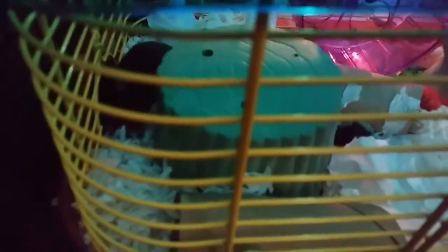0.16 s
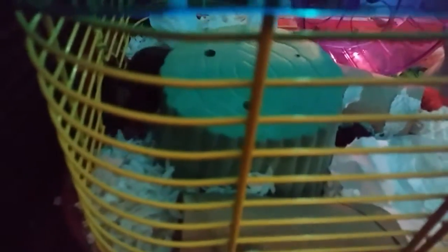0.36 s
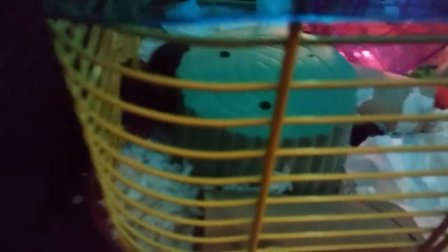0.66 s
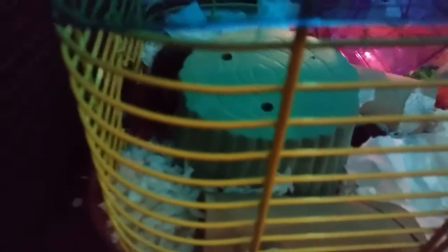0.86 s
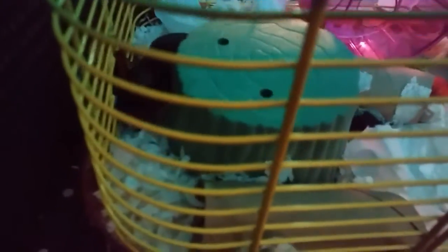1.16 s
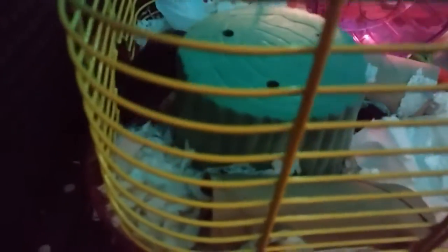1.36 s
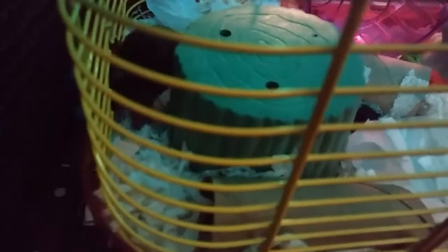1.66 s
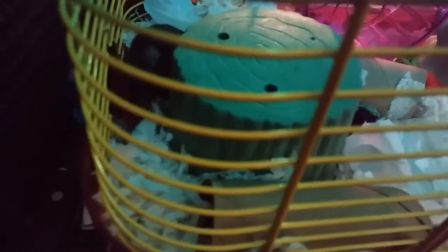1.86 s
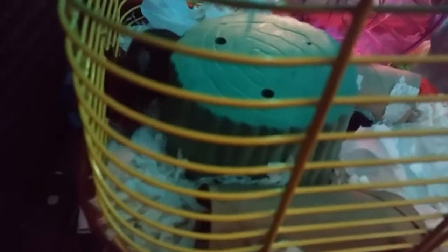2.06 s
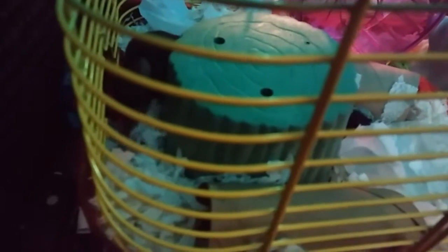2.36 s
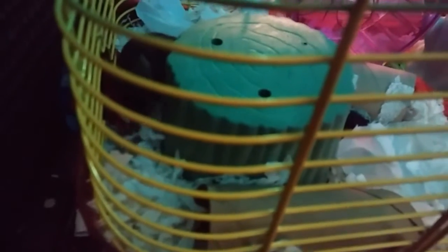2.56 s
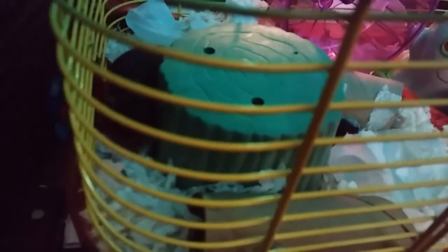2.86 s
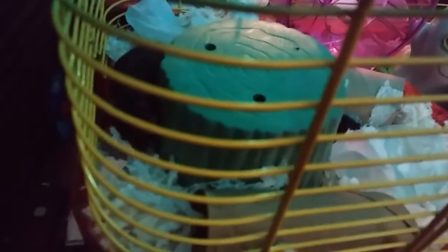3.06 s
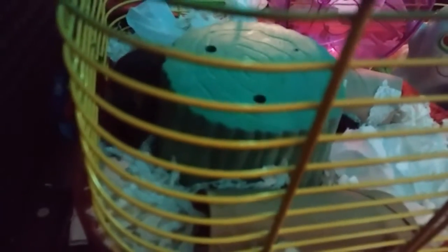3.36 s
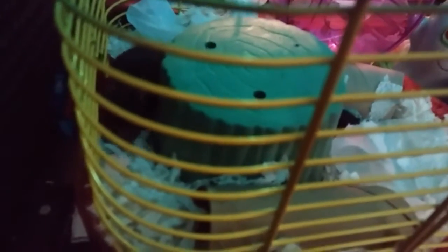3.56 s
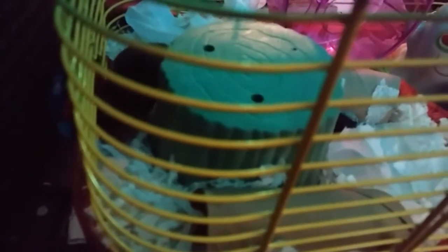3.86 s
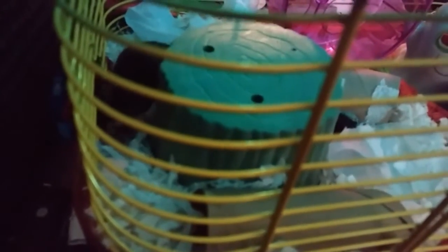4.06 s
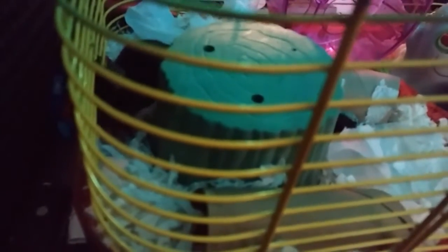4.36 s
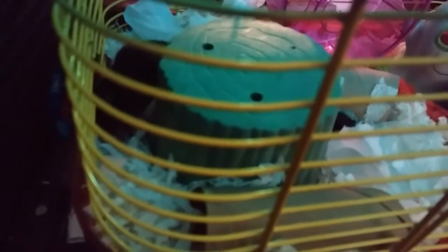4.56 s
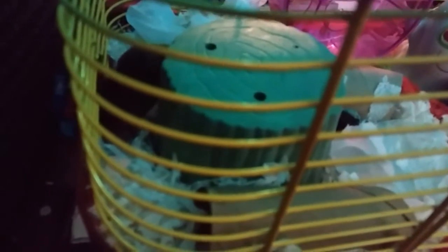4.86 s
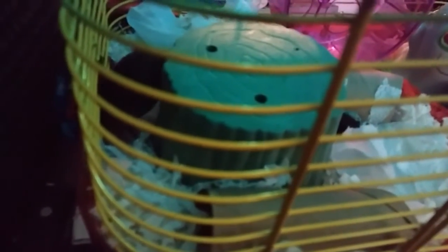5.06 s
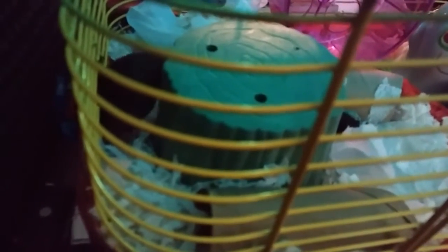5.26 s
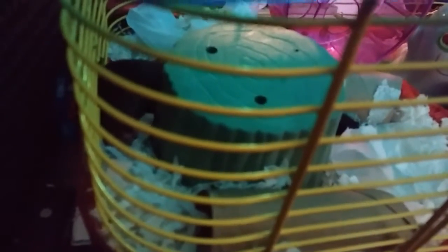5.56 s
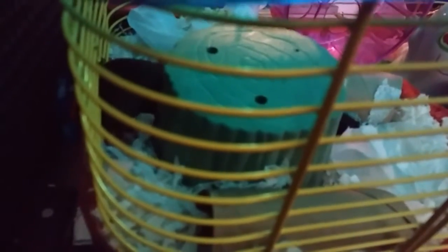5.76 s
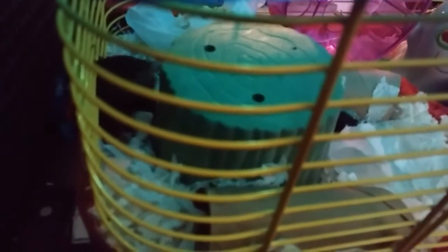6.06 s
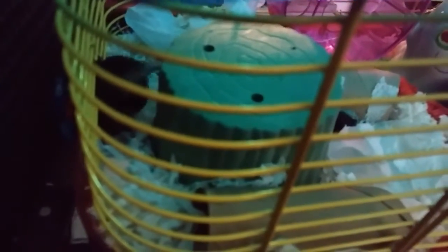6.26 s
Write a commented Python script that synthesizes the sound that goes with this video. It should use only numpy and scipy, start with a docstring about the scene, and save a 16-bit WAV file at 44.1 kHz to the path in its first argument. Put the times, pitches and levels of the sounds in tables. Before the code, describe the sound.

Close, dry clicks, snaps and rubs of a handled plastic phone case over faint paper bedding rustle and soft hiss.

```python
"""Handling a phone near a small pet

Fingers rub and tap a phone's plastic case, which ticks, snaps and flexes with dull thumps.
These sounds reach the microphone straight through the case, so they have no echo.
Faintly behind them, a small pet shuffles through paper bedding in its cage.
Under it all lie a quiet room hum and microphone hiss."""
import sys
import numpy as np
from scipy import signal
from scipy.fft import rfft, irfft
from scipy.io import wavfile
from scipy.ndimage import uniform_filter1d

SR = 44100
rng = np.random.default_rng(int(sys.argv[2]) if len(sys.argv) > 2 else 0)


def transcribe(u):
    """Save the signal u as a 16-bit wav file named by the first command-line argument.

    u: samples, shape (n,) or (channels, n), limited to [-1, 1]; the rate is SR.
    q: integer samples, one column per channel.
    """
    v = np.clip(np.atleast_2d(u).T, -1, 1)
    q = np.round(v * 32767).astype(np.int16)
    wavfile.write(sys.argv[1], SR, q)


N = 283104
TIME = np.arange(N) / SR

# Ticks of the case. Each row: time in seconds, level in dB, pitch in Hz,
# hardness from 0 (dull) to 1 (bright), rebound level in dB compared with the tick.
CASE_TICKS = [(0.0292, -18, 1880, .14, -11), (0.0704, -14, 1780, .01, -17),
              (.1448, -14.5, 1960, 0.11, -9.5), (0.172, -17, 1600, .01, -10),
              (.228, -14.5, 1700, .01, -7.5), (.3255, -14.5, 1690, .01, -8.5),
              (0.3699, -20, 1570, .01, -5.5), (0.6018, -17, 1800, 0.19, -25),
              (0.7343, -21, 1160, 0.022, -15), (1.0162, -26, 1780, .25, -18),
              (1.099, -19.5, 1980, 0.19, -22), (1.1135, -21, 1600, 0.15, -20),
              (1.1561, -15, 1800, 0.14, -24), (1.1625, -12.5, 1820, 0.26, -24),
              (1.1874, -23, 1500, 0.27, -21), (1.2133, -13.5, 1510, 0.064, -16),
              (1.5861, -13.5, 1840, 0.1, -6), (1.5941, -19, 1200, .01, -22),
              (1.6305, -10.5, 1550, 0.21, -10), (1.645, -22.5, 1530, 0.21, -10),
              (1.712, -24, 1980, .25, -13), (1.728, -32, 1860, 0.22, -21), (1.74, -31, 1810, 0.25, -19),
              (2.128, -31, 1730, 0.21, -14), (2.8642, -28.5, 890, .01, -20),
              (4.0578, -19.5, 1390, 0.11, -29)]
# Loud snaps, each led in by a creak. Each row: time in seconds, level in dB, hardness from 0 to 1,
# creak length in seconds, creak level in dB.
CASE_SNAPS = [(2.722, -8, 0.19, 0.0074, -20), (4.3403, -2, .86, 0.0075, -24.5),
              (4.6224, -3, .98, 0.0026, -16.5), (5.4764, -4.5, .98, 0.0063, -19.5)]
# Soft taps. Each row: time in seconds, peak level in dB.
FINGER_TAPS = [(.346, -30.5), (.474, -28.5), (.681, -29), (.724, -25.5), (.779, -28.5), (.8791, -26),
               (.972, -27), (1.002, -26.5), (1.016, -24), (1.114, -17), (1.133, -32), (1.175, -22.5),
               (1.188, -17.5), (1.325, -30.5), (1.387, -36.5), (1.442, -35.5), (1.477, -34.5), (1.645, -17),
               (1.917, -25), (2.161, -42), (2.189, -24), (2.271, -25.5), (2.556, -30), (2.618, -27.5),
               (2.657, -26), (2.864, -26.5), (2.915, -25.5), (3.338, -34), (3.518, -36.5), (4.745, -31),
               (4.775, -33), (4.959, -31), (5.067, -40), (5.117, -26.5), (5.232, -36.5), (5.35, -35),
               (5.37, -36), (5.386, -28)]
# Flexes of the case. Each row: time in seconds, peak level in dB, pitch in Hz.
CASE_THUMPS = [(.1779, -24.5, 175), (0.2336, -19.5, 208), (0.3786, -20.5, 237), (.4465, -34, 196),
               (0.5999, -27, 335), (0.775, -32.5, 180), (1.3509, -29.5, 167), (1.633, -10, 269),
               (1.6471, -17.5, 260), (2.7171, -21, 820), (2.763, -31, 124), (3.031, -42, 110),
               (4.3416, -21.5, 196), (4.455, -33, 170), (4.6228, -8.5, 573), (5.4782, -22, 194.7),
               (6.373, -36.5, 176)]
# The notes the case rings at. Each row: pitch in Hz, seconds to fade by 60 dB, strength in dB.
CASE_NOTES = [(215, 0.043, -52), (419, 0.022, 1.5), (500, 0.011, -7.5), (844, 0.008, -8.5),
              (1026, 0.033, -14.5)]
# Finger strokes. Each row: start and end in seconds, base level in dB, extra scratch and rumble in dB.
FINGER_STROKES = [(.459, 0.511, -52, 2, -1), (0.686, 0.736, -45.5, -2, 1), (0.733, 0.767, -38, 5.5, -3),
                  (0.778, .857, -50.5, 7, 0), (0.872, 0.897, -42.5, -23, -8), (.966, 1.052, -44, 4.5, 0.5),
                  (1.105, 1.141, -40, -18, -0.5), (1.153, 1.19, -35, -0.5, 0),
                  (1.211, 1.243, -39, 8.5, -10), (1.239, 1.274, -47.5, 12, -20),
                  (1.579, 1.674, -42.5, -13, -2), (1.711, 1.747, -44.5, -17, 2),
                  (2.527, 2.672, -49, -19, -7), (2.705, 2.808, -37, -1.5, -11),
                  (2.854, 2.923, -40.5, -24, -25), (3.236, 3.255, -62.5, 16, -8),
                  (3.507, 3.522, -49.5, -4, 3), (4.21, 4.243, -58, -8, 9.5), (4.416, 4.5, -41, -5.5, -12),
                  (4.513, 4.634, -42.5, -24, -19), (4.74, 4.792, -45.5, -3, -3),
                  (6.227, 6.272, -65, -5, 13)]
# How strongly the pet shuffles. Each row: time in seconds, base level in dB.
PET_SHUFFLE = [(0, -55.5), (.45, -55.5), (.9, -57), (1.4, -53.5), (1.8, -55), (2.1, -55.5), (2.28, -53.5),
               (2.55, -58.5), (2.8, -49.5), (2.95, -60.5), (3.05, -54), (3.35, -63), (3.52, -62.5),
               (3.68, -66), (4.1, -62), (4.45, -59), (4.8, -60), (4.92, -61.5), (5.42, -59), (5.6, -65),
               (6.17, -68.5), (6.42, -61.5)]
# The pet holds still. Each row: middle of the pause in seconds, length in seconds.
PET_PAUSES = [(2.016, 0.14), (2.356, 0.06), (4.163, 0.029), (4.718, 0.057), (5.29, 0.11)]
# The room's hum. Each row: pitch in Hz, width in Hz, level in dB.
HUM_BANDS = [(120, 26, -80.5), (234.7, 25, -70), (362, 21, -68)]

# A "colour" says how strong the low and high parts of a sound are.
# The colour of a dull tick. Each row: multiple of the tick's pitch, strength in dB.
DULL_COLOUR = [(.03, -6.5), (.08, -9), (.24, 5), (.5, 0), (1, 0.5), (1.4, -4), (1.9, -15.5), (2.8, -25.5),
               (4, -60.5), (9, -74.5)]
# The other colours. Each row: frequency in Hz, strength in dB.
SNAP_COLOUR = [(40, -28.5), (120, -7), (350, 4), (900, -1), (2000, -4.5), (3500, -13.5), (6000, -19),
               (9000, -30), (14000, -23.5), (17000, -39.5)]  # a bright snap of plastic
RUB_COLOUR = [(60, -22), (250, -6.5), (450, -5), (800, -1.5), (1150, -11), (1450, -17.5), (3000, -14),
              (8000, -43)]  # what sliding skin feeds into the case
SCRATCH_COLOUR = [(450, -28.5), (750, 14), (1080, 9.5), (1450, 0.5), (1950, 2), (2400, 1.5), (2850, -9.5),
                  (3600, -9), (4600, -22.5), (9000, -31), (16000, -48)]  # dry skin scratching
SIZZLE_COLOUR = [(2500, -33), (6500, 2), (12000, -4.5), (16000, -9.5)]  # the high sizzle of the driest strokes
RUMBLE_COLOUR = [(25, -6), (70, -17.5), (160, 0), (280, -3), (600, -21), (3000, -53)]  # the rumble under a stroke
PAPER_COLOUR = [(25, -39.5), (65, -1), (160, 4.5), (280, 0.5), (430, 0.5), (700, -13), (1200, -17.5),
                (2500, -25.5), (8000, -36.5)]  # shifting paper bedding
HISS_COLOUR = [(25, 7), (80, 11.5), (350, 8.5), (700, 11), (1500, 6.5), (3000, 3.5), (6000, -0.5),
               (9500, -5.5), (12500, -0.5), (15600, 0.5), (16200, -28.5)]  # microphone hiss


def ticks(rebound_s=0.0028, rebound_hz=1380, rebound_hardness=0.42):
    """The case ticks under the fingers and rebounds more weakly a moment later."""
    out = np.zeros(N)
    delays = rebound_s * (1 + 0.12 * rng.standard_normal(len(CASE_TICKS)))
    for (s, db, hz, hardness, rebound_db), delay_s in zip(CASE_TICKS, delays):
        add_jerk(out, s, db, hz, hardness)
        add_jerk(out, s + delay_s, db + rebound_db, rebound_hz, rebound_hardness)
    return out


def snaps(hz=1620, creak_hardness=0.28, gap_s=0.00122, jitter_s=0.00005):
    """Under a harder squeeze the case creaks in a run of quick jerks, then snaps through."""
    out = np.zeros(N)
    jitters = jitter_s * rng.standard_normal((len(CASE_SNAPS), 12))
    for (s, db, hardness, creak_s, creak_db), jitter in zip(CASE_SNAPS, jitters):
        start = s - creak_s
        add_jerk(out, start, creak_db + 6.5, hz, creak_hardness)  # the creak's first, louder jerk
        add_jerk(out, s, db, hz, hardness)  # the snap
        delays = np.arange(gap_s, 0.72 * creak_s, gap_s)  # the creak stops just before the snap
        for delay_s, late_s in zip(delays, jitter):
            add_jerk(out, start + delay_s + late_s, creak_db, hz, creak_hardness)
    return out


def add_jerk(out, s, db, hz, hardness, chatter_s=0.0018, smear_hz=1300):
    """Mix in one jerk of plastic letting go. The harder the release, the brighter it sounds."""
    t = TIME[:512]
    dull = click([(multiple * hz, gain_db) for multiple, gain_db in DULL_COLOUR])
    # A dull tick is smeared into a short wiggle, its low and high parts arriving at slightly different times.
    smear = np.exp(-2 * np.pi * smear_hz / SR)
    dull = signal.lfilter([smear, -1], [1, -smear], dull)
    jerk = (1 - hardness) * unit_peak(dull) - hardness * click(SNAP_COLOUR)
    # The surfaces chatter for a few milliseconds afterwards.
    chatter = 0.091 * (1 - hardness) * rng.standard_normal(len(t)) * np.exp(-t / chatter_s)
    sound = signal.fftconvolve(unit_peak(jerk), (t == 0) + chatter)
    peak_s = np.argmin(sound) / SR
    add(out, s - peak_s, gain(db) * sound)


def taps(contact_s=0.00052, grip_detune=0.08):
    """A soft push from a fingertip or a tick makes the case ring very briefly."""
    out, t = np.zeros(N), TIME[:512]
    push = t * np.exp(-2 * t / contact_s)
    tick_pushes = [(s + 0.0016, db - 21) for s, db, *_ in CASE_TICKS]
    for s, db in list(FINGER_TAPS) + tick_pushes + finger_catches():
        detune = grip_detune * rng.standard_normal(len(CASE_NOTES))  # the grip shifts each note
        tap = signal.fftconvolve(case_ring(detune), push)
        add(out, s - contact_s, -gain(db) * unit_peak(tap))
    return out


def finger_catches():
    """A sliding finger catches twice per stroke, at random. Each row: time in seconds, level in dB."""
    return [(rng.uniform(start, end), db + rng.normal(6, 2))
            for start, end, db, _, _ in FINGER_STROKES for _ in range(2)]


def case_ring(detune):
    """One knock sets off the case's notes, and each dies away quickly."""
    t = TIME[:2048]
    return sum(gain(db - 60 * t / fade_s) * np.cos(2 * np.pi * hz * (1 + shift) * t)
               for (hz, fade_s, db), shift in zip(CASE_NOTES, detune))


def thumps(width_cycles=0.56):
    """The wall of the case dips and springs back in one low swing."""
    out, t = np.zeros(N), np.arange(-1024, 1024) / SR
    for s, db, hz in CASE_THUMPS:
        swing = np.sin(2 * np.pi * hz * t) * np.exp(-(t * hz / width_cycles) ** 2)
        add(out, s + t[0], gain(db) * unit_peak(swing))
    return out


def rubbing(fade_s=0.015, swell_db=2.5):
    """Skin drags over the case in many tiny slips: a hollow tone with scratch, sizzle and rumble."""
    body, scratch, sizzle, rumble = np.zeros((4, N))
    for start, end, db, scratch_db, rumble_db in FINGER_STROKES:
        progress = np.clip((TIME - start) / (end - start), 0, 1)
        pressure = np.sin(np.pi * progress) - 2 / np.pi  # the finger presses hardest midway
        stroke = gain(db + swell_db * pressure) * fade_in_out(start, end, fade_s)
        body += stroke
        scratch += stroke * gain(scratch_db)
        sizzle += stroke * gain(2 * scratch_db)  # only the driest strokes reach the high treble
        rumble += stroke * gain(rumble_db)
    drag = slips(2000, 2.56) * flutter(84, 0.96)
    hollow = signal.fftconvolve(drag, case_ring(detune=np.zeros(len(CASE_NOTES))))
    return (body * gain(-2.24) * colour(hollow, RUB_COLOUR)
            + scratch * gain(-9) * colour(slips(2200, 3.4), SCRATCH_COLOUR)
            + sizzle * gain(-37) * colour(slips(5000, 2.2), SIZZLE_COLOUR)
            + rumble * gain(-1) * colour(slips(1500, 2.6), RUMBLE_COLOUR))


def bedding(boost_db=2.5, pause_db=-7.5):
    """Soft paper shifts in small muffled crinkles, and quietens when the pet holds still."""
    still = sum(fade_in_out(s - length / 2, s + length / 2, fade_s=0.011) for s, length in PET_PAUSES)
    shuffle_db = np.interp(TIME, *np.transpose(PET_SHUFFLE))
    crinkles = colour(slips(900, 3.2) * flutter(28, 2.4), PAPER_COLOUR)
    return gain(shuffle_db + boost_db + pause_db * still) * crinkles


def microphone_hiss(hiss_db=-61, whine_db=-80):
    """The microphone hisses steadily, with a thin, wavering whine."""
    whine_hz = 8230 + 70 * np.log(flutter(300, 7))
    whine = unit_level(np.sin(2 * np.pi * np.cumsum(whine_hz) / SR))
    hiss = colour(rng.standard_normal(N), HISS_COLOUR)
    return gain(hiss_db) * hiss + gain(whine_db) * whine


def room_hum():
    """The room hums in three low, narrow bands of noise."""
    out, frequencies = np.zeros(N), np.fft.rfftfreq(N, 1 / SR)
    noise = rfft(rng.standard_normal(N))
    for hz, width_hz, db in HUM_BANDS:
        band = noise / (1 + (2 * (frequencies - hz) / width_hz) ** 2)
        out += gain(db) * unit_level(irfft(band, N))
    return out


def slips(per_second, spread_db):
    """Tiny slips at random moments, a few much larger than the rest."""
    sizes = gain(spread_db * np.minimum(rng.exponential(size=N), 4))
    return (rng.random(N) < per_second / SR) * sizes * rng.choice([-1, 1], N)


def flutter(per_second, depth_db):
    """A volume that wanders up and down at random."""
    steps = rng.standard_normal(4096)
    return gain(depth_db * np.interp(TIME * per_second, np.arange(len(steps)), steps))


def click(points, size=4096):
    """A single click with the given colour and a peak of 1."""
    hz, db = np.transpose(points)
    frequencies = np.fft.rfftfreq(size, 1 / SR) + 1
    log_gain = np.log(gain(np.interp(np.log(frequencies), np.log(hz), db)))
    # Keeping only the first half packs the click's energy at its start.
    half = irfft(log_gain)[:size // 2]
    half[0] /= 2
    spectrum = np.exp(rfft(2 * half, size))
    return unit_peak(irfft(spectrum)[:size // 2])


def colour(x, points):
    """Give a sound a colour and an average level of 1."""
    return unit_level(signal.fftconvolve(x, click(points))[:N])


def fade_in_out(start, end, fade_s):
    """A volume that rises from 0 to 1 around the start and falls back around the end."""
    return np.clip(np.minimum(TIME - start, end - TIME) / fade_s + 0.5, 0, 1)


def gain(db):
    """Turn decibels into a number to multiply by."""
    return 10 ** (np.asarray(db) / 20)


def unit_level(x):
    """Scale a sound to an average (rms) level of 1."""
    return x / np.sqrt(np.mean(x ** 2))


def unit_peak(x):
    """Scale a sound to a peak of 1."""
    return x / np.abs(x).max()


def add(out, s, sound):
    """Mix a sound in, starting at s seconds."""
    i = max(int(round(s * SR)), 0)
    out[i:i + len(sound)] += sound[:max(N - i, 0)]


def noise_suppressor(x, threshold_db=-55, max_cut_db=6, window_s=0.02, listen_hz=1500):
    """The phone turns everything down a little when the low and middle sounds fall quiet."""
    heard = signal.sosfilt(signal.butter(2, listen_hz, fs=SR, output="sos"), x)
    power = uniform_filter1d(heard ** 2, int(window_s * SR))
    level_db = 10 * np.log10(np.maximum(power, 1e-12))
    gain_db = np.clip(0.97 * (level_db - threshold_db), -max_cut_db, 0)
    return x * gain(uniform_filter1d(gain_db, int(window_s * SR / 2)))


def scene():
    """The handling, the pet and the background meet at one microphone."""
    handling = ticks() + snaps() + taps() + thumps() + rubbing()
    return (handling + bedding() + microphone_hiss() + room_hum())[None]


def record(dry):
    """The phone cuts the deepest bass, turns down quiet moments and cuts the highest treble."""
    bass_cut = signal.butter(4, 46, "highpass", fs=SR, output="sos")
    treble_cut = signal.ellip(8, 0.2, 70, 16600, fs=SR, output="sos")
    return signal.sosfilt(treble_cut, noise_suppressor(signal.sosfilt(bass_cut, dry)))


dry = scene()
out = record(dry)
transcribe(out)
```